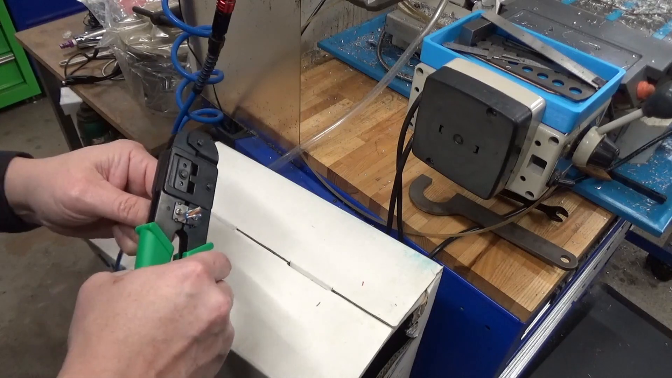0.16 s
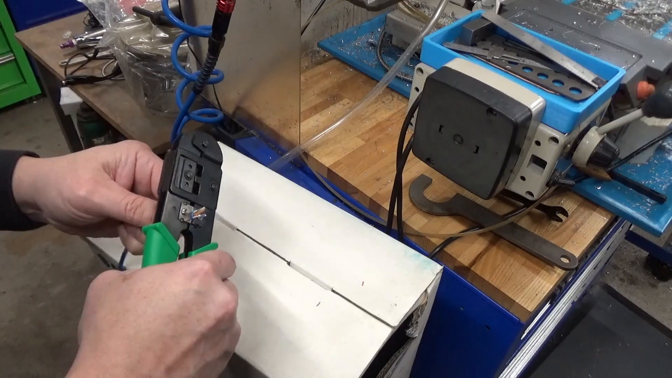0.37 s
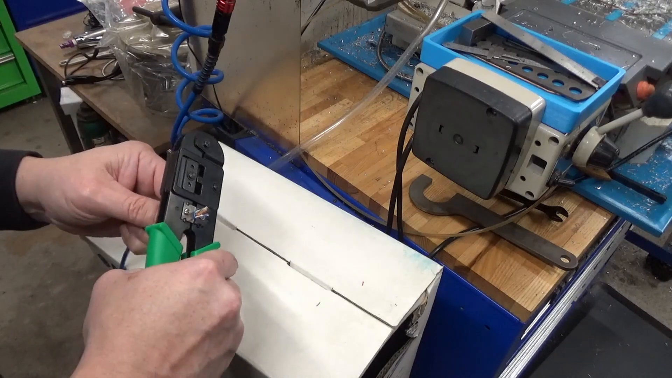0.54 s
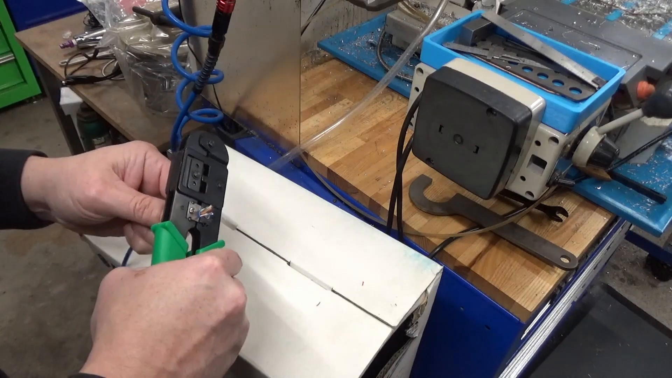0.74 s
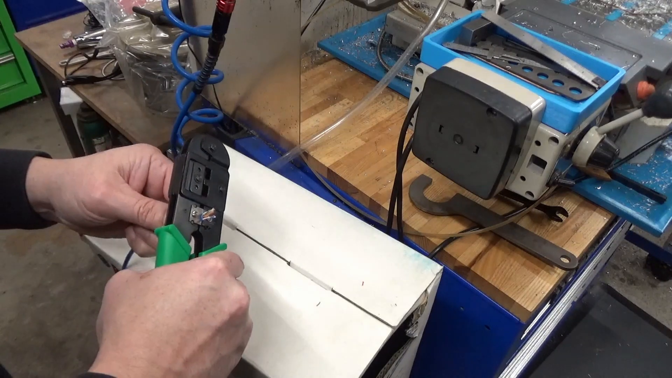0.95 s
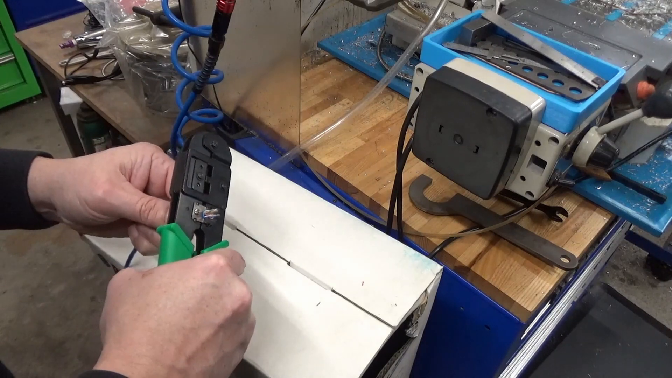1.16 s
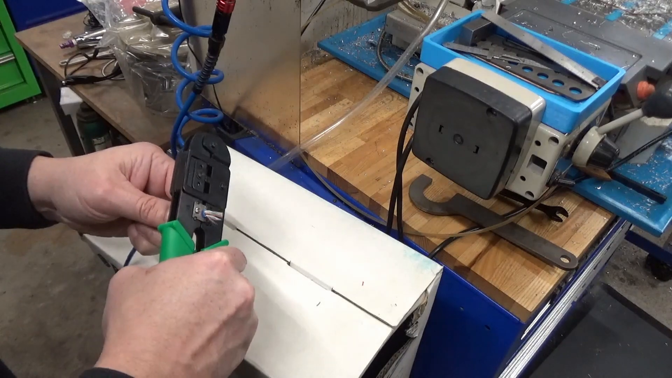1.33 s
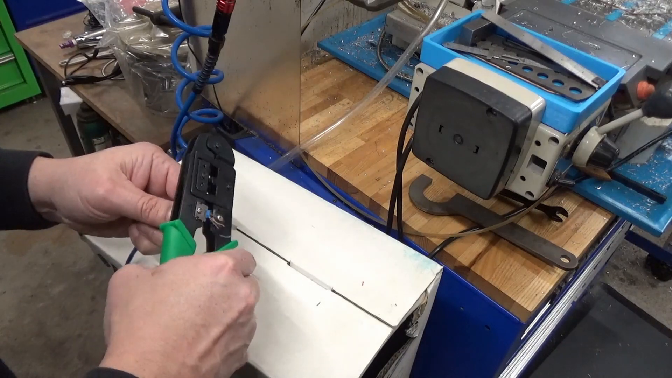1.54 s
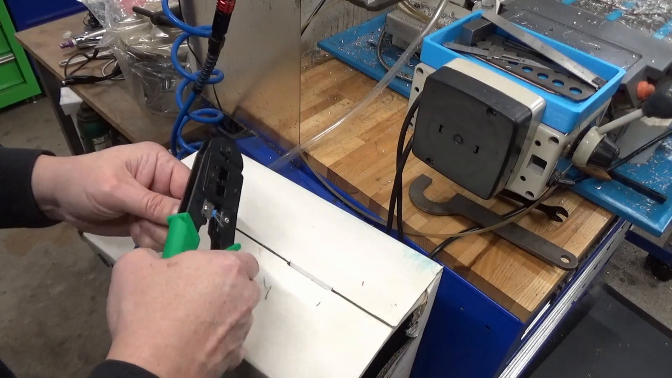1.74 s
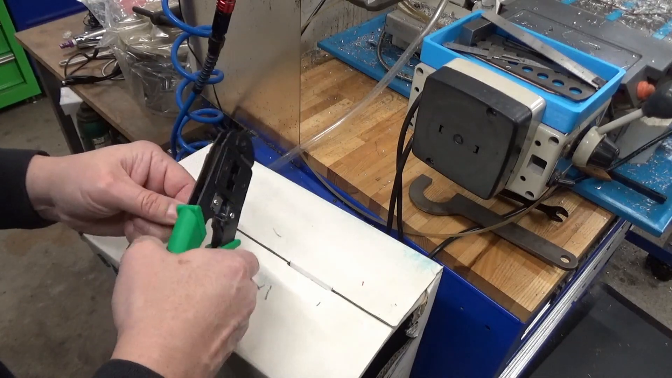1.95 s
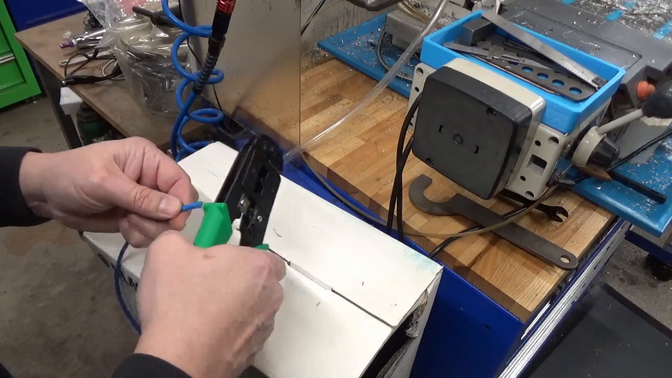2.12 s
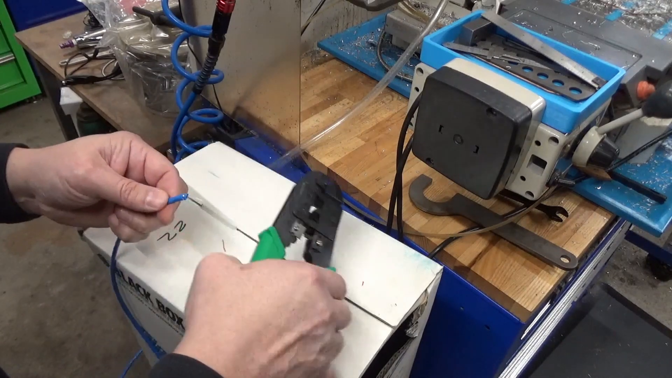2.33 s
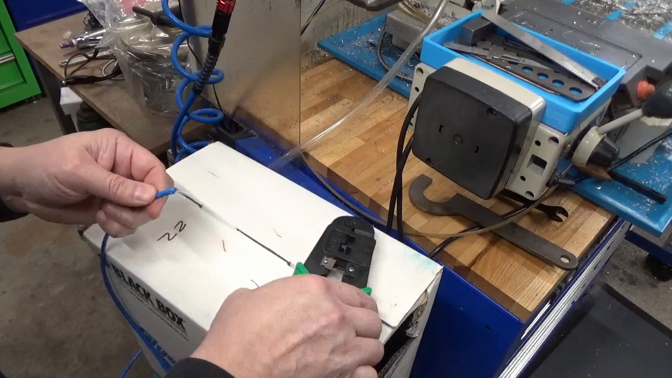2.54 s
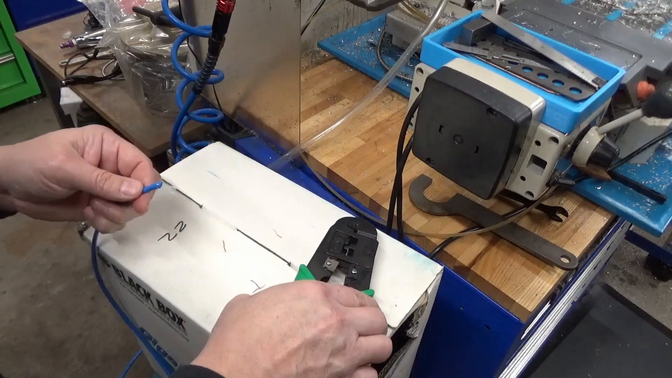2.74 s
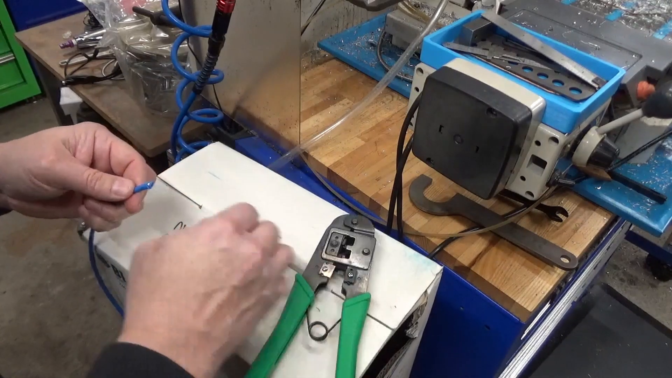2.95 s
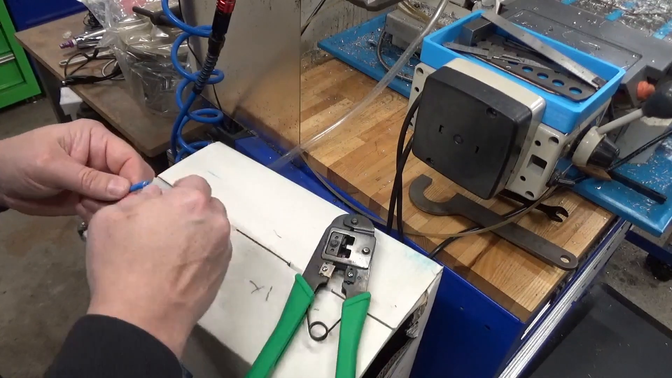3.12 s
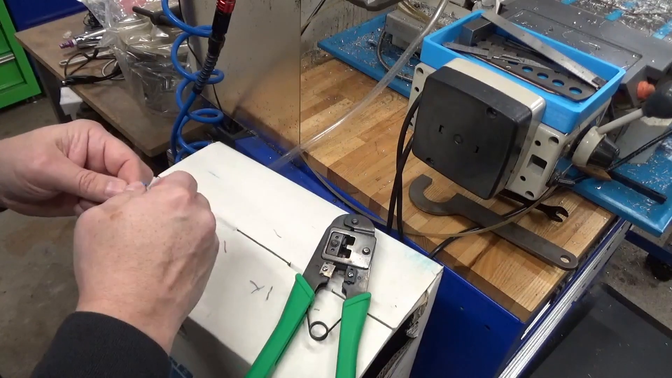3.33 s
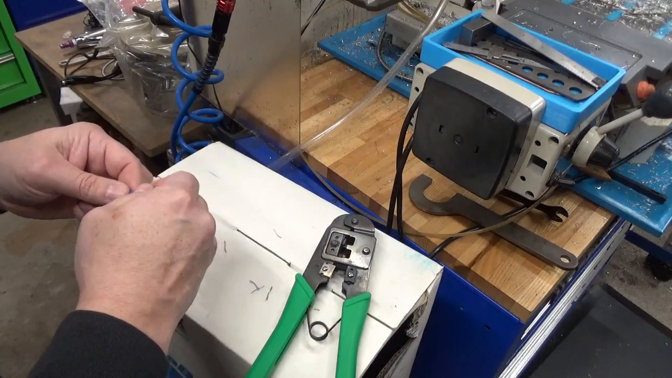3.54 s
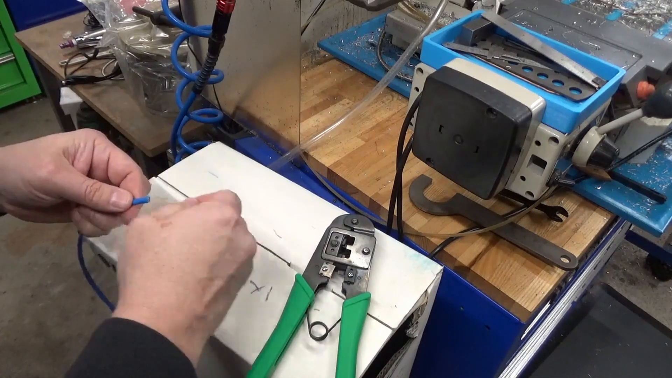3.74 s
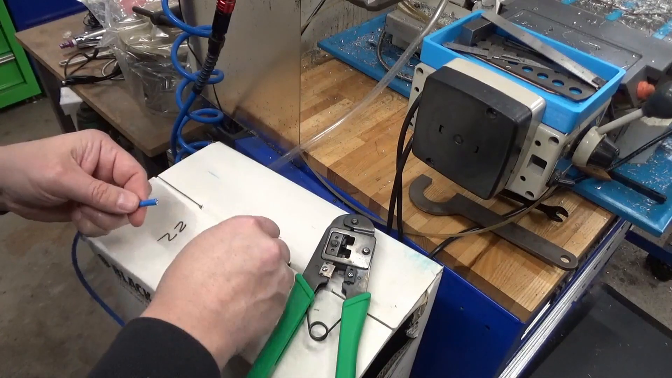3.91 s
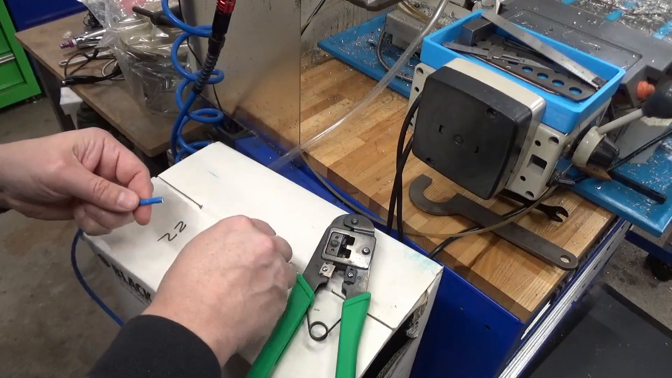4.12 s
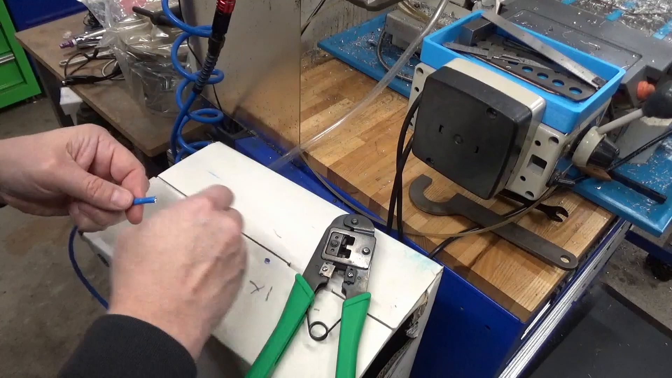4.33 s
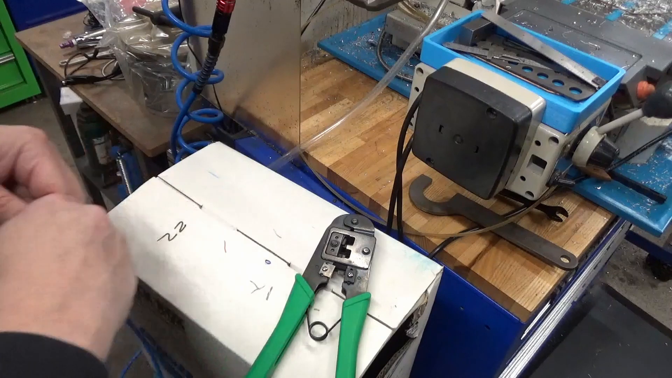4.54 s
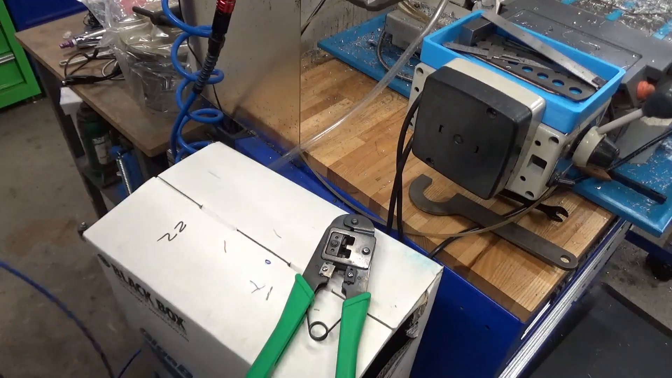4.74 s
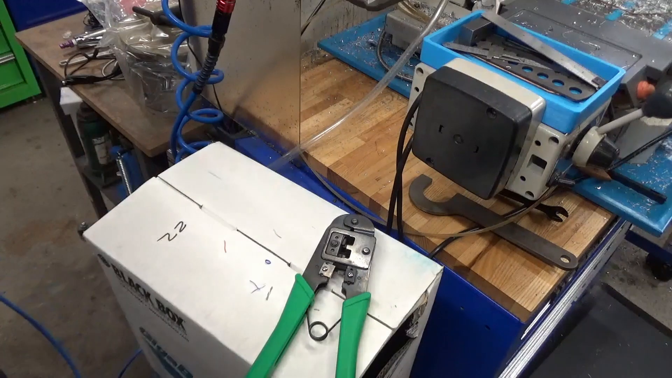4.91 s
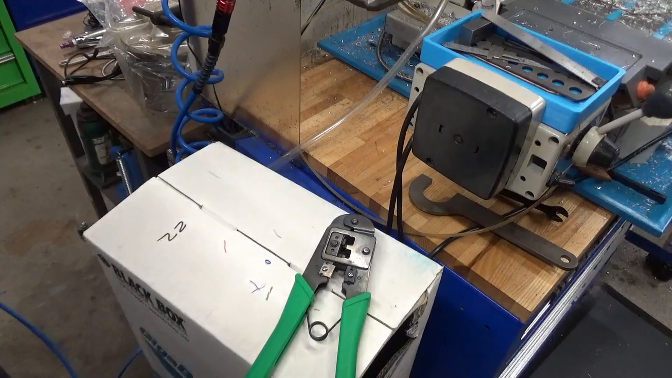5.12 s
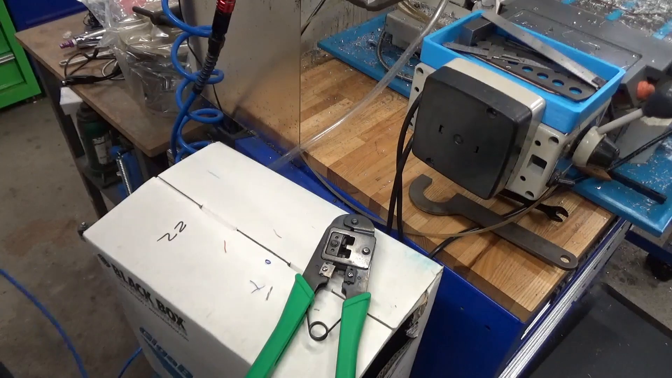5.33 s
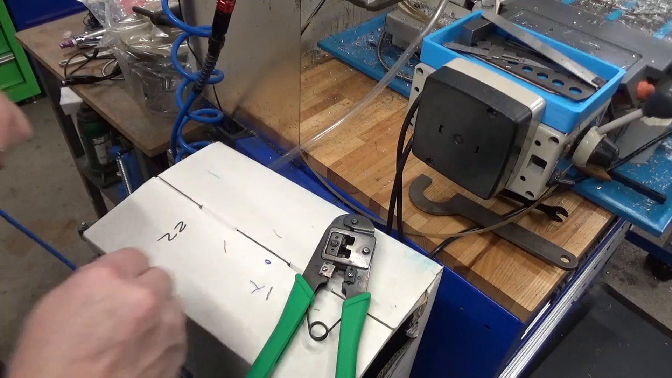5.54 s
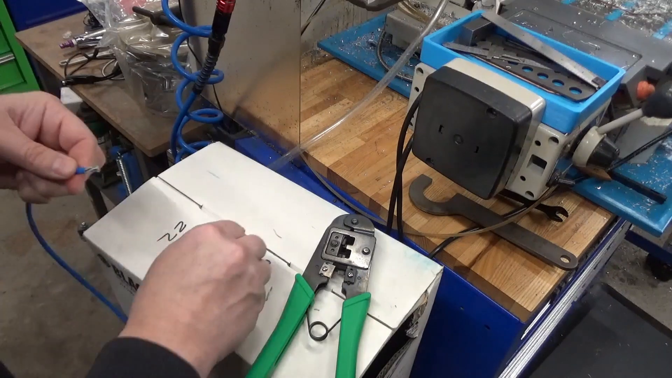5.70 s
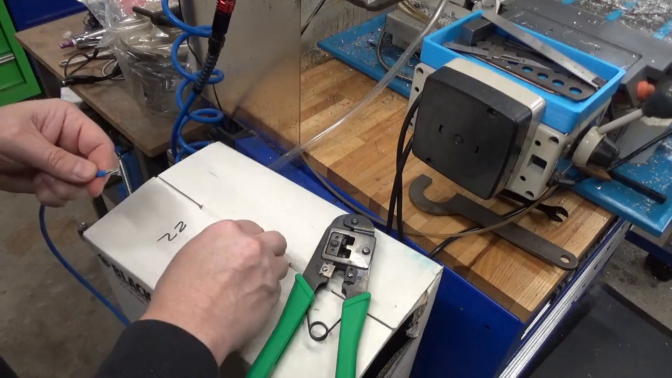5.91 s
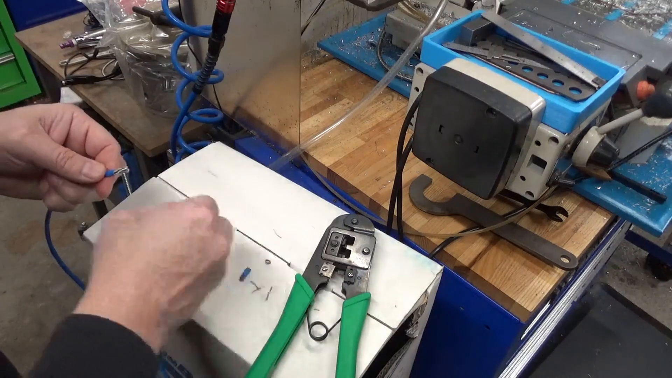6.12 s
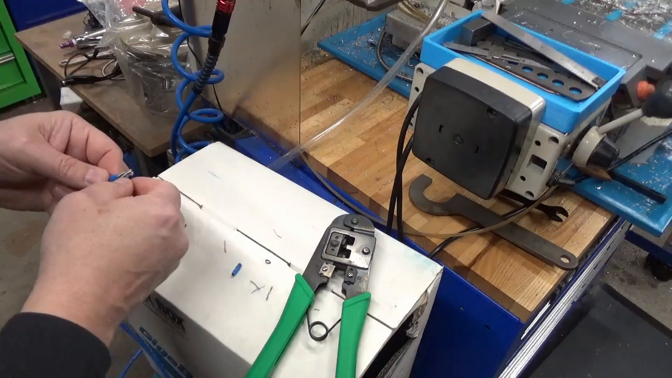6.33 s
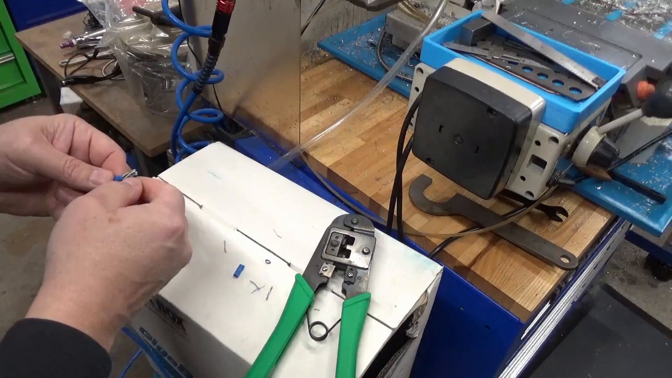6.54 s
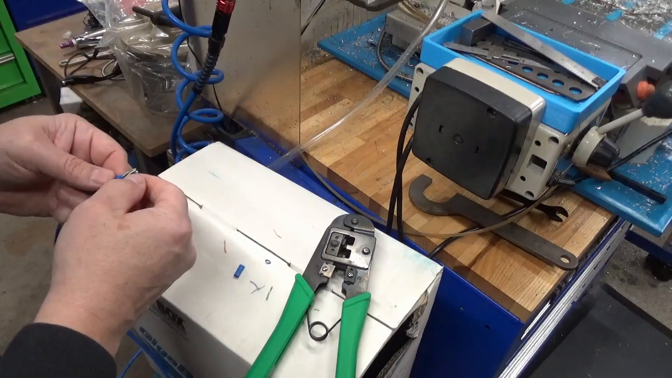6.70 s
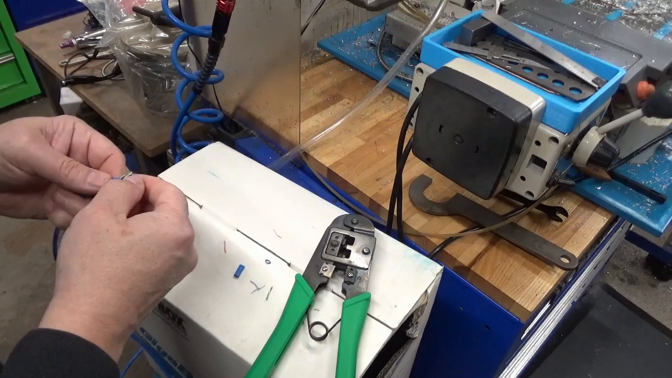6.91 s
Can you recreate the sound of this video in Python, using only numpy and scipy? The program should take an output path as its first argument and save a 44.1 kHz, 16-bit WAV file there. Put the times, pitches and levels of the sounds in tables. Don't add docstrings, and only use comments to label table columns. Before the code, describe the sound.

Near stereo camera microphone, small hard-surfaced workshop with short reverberation. Quiet handling leads to one bright metallic bite and a dense run of ratchet clicks. The tool touches, slides and thumps onto an empty-sounding box. Small cable cuttings snap and fall, skin rubs cardboard, a brief low puff of air passes, and wire ends click irregularly. Soft hiss, distant motor drone and a tiny steady camera tick continue underneath.

```python
import sys
import numpy as np
from scipy import signal
from scipy.fft import rfft, irfft
from scipy.io import wavfile
from scipy.ndimage import uniform_filter1d

SR = 44100
rng = np.random.default_rng(int(sys.argv[2]) if len(sys.argv) > 2 else 0)


def dump_mix(stems):
    frames = np.atleast_2d(stems).T
    limited = np.clip(frames, -1, 1)
    pcm = np.round(limited * 32767).astype(np.int16)
    wavfile.write(sys.argv[1], SR, pcm)


def invert_db(level):
    return 10 ** (np.asarray(level, dtype=float) / 20)


N = 307124

# (frequency [Hz], level [dB], T60 [s])
BOX_MODES = [(329, 4.5, 0.085), (390, 5.5, 0.09), (458.4, 3, 0.07), (539, -1, 0.066), (601, 2.5, 0.075),
             (706, 0, 0.048), (792, 3, 0.038), (870, -2, 0.023)]
# (frequency [Hz], level [dB], T60 [s])
KNOCK_MODES = [(850, 2, 0.009), (980, 1, 0.012), (1196, 1, 0.0096), (1390, 1, 0.0085), (1670, -4, 0.006),
               (2010, -5, 0.004)]
# (frequency [Hz], level [dB], T60 [s])
SPARKLE_MODES = [(6000, 0.37, 0.0031), (6610, -1.2, 0.0063), (7290, 1.8, 0.0037), (7910, 0.5, 0.0062),
                 (8450, 0, 0.0041), (9330, -0.71, 0.0042), (10650, -0.66, 0.0025)]


def rms_one(x):
    return x / np.sqrt(np.mean(x ** 2) + 1e-20)


def in_time(rows):
    s, *columns = np.transpose(rows)
    return [np.interp(np.arange(N) / SR, s, column) for column in columns]


def at_hz(points, hz):
    point_hz, value = np.transpose(points)
    return np.interp(np.log(hz), np.log(point_hz), value)


def drift(rate):
    r = np.exp(-80 * np.pi * rate / SR)
    white = rng.standard_normal(N // 40 + 2002)
    slow = signal.lfilter([1], [1, -2 * r, r * r], white)[2000:]
    return np.interp(np.arange(N) / 40, np.arange(len(slow)), rms_one(slow))


def ring(force, hz, t60):
    r, w = invert_db(-60 / (t60 * SR)), 2 * np.pi * hz / SR
    return signal.lfilter([0, np.sin(w)], [1, -2 * r * np.cos(w), r * r], force + 1e-18)


def band(x, low_hz, high_hz):
    return signal.sosfilt(signal.butter(2, [low_hz, high_hz], "band", fs=SR, output="sos"), x)


def within(x, modes):
    return band(x, modes[0][0] * .65, modes[-1][0] * 1.4)


def stereo_band(white, low_hz, high_hz, likeness):
    mid, side = band(white, low_hz, high_hz)
    alike = np.clip(at_hz(likeness, np.sqrt(low_hz * high_hz)), -1, 1)
    return np.sqrt(1 + alike) * mid + np.sqrt(1 - alike) * side * [[1], [-1]]


def air(patchy_db):
    # (frequency [Hz], level [dB per Hz])
    spectrum = [(12, -31), (20, -3), (39, -5.5), (59, -14.5), (124, -6.5), (184, -11.5), (320, -13),
                (375, -14.5), (896, -14), (1080, -17), (1300, -14.5), (2080, -19), (3020, -22.5),
                (3730, -23.5), (11000, -28.5), (14300, -59), (22000, -120)]
    # (frequency [Hz], coherence [1])
    likeness = [(60, 1), (170, 0.89), (490, 0.066), (1400, 0.028), (4000, 0.057), (11000, 0.73)]
    out, together = 0, drift(1.5)
    edges = 18 * 2 ** np.arange(0, 9.6, .4)
    white = rng.standard_normal((2, 2, N + SR))
    for k, (low, high) in enumerate(zip(edges, edges[1:])):
        pair = stereo_band(white[k % 2], low, high, likeness)[:, SR:]
        out = out + invert_db(at_hz(spectrum, np.sqrt(low * high)) + patchy_db * together) * pair
    return invert_db(-61.5) * rms_one(out)


def hum():
    # (frequency [Hz], rms level [dB])
    motors = [
        (119.8, -69),
        (147, -78),
    ]
    out = 0
    for hz, level_db in motors:
        turns = np.arange(N) * hz / SR + 0.096 * drift(2.0)
        out = out + invert_db(level_db + 2.0 * drift(4.7)) * np.sqrt(2) * np.sin(2 * np.pi * turns)
    return out


def draught():
    # (time [s], level [dB])
    gust = [
        (4.9, -84),
        (4.96, -57),
        (5.04, -70),
        (5.15, -56),
        (5.22, -64),
        (5.28, -87),
    ]
    level_db, = in_time(gust)
    turbulence = ring(rng.standard_normal(N), 33, .15)
    return invert_db(level_db) * rms_one(ring(turbulence, 38, .15))


def lens_motor():
    # (time [s], level [dB])
    ticking = [
        (0, -73.5),
        (.8, -75.5),
        (1.0, -97),
        (2, -76),
        (3.6, -72),
        (4.6, -79),
        (5.2, -71.5),
        (6.96, -73),
    ]
    level_db, = in_time(ticking)
    frame = np.arange(N) / SR * 30000 / 1001 - .15
    step = np.exp(-(frame % 1) * 5.4) * rng.standard_normal(N)
    odd = frame % 2 > 1
    shell = ring(step, 2830, 0.0057) + invert_db(-5 + 1.7 * odd) * ring(step, 3320, 0.0076)
    return invert_db(level_db) * rms_one(shell)


def workshop(x):
    # (frequency [Hz], T60 [s])
    reverberation = [(150, 0.45), (600, 0.33), (2500, 0.28), (6000, 0.25), (11000, 0.14)]
    # (frequency [Hz], coherence [1])
    likeness = [(150, 1), (600, 0.96), (2500, 0.68), (8000, 0.37)]
    s = np.arange(SR // 2) / SR
    bench = 1 + 2.1 * np.exp(-s / 0.0088)
    onset = np.minimum(s / 0.0022, 1)
    echoes, edges = 0, 130 * 2 ** np.arange(0, 7, .8)
    for low, high in zip(edges, edges[1:]):
        pair = stereo_band(rng.standard_normal((2, len(s))), low, high, likeness)
        dying = invert_db(-60 * s / at_hz(reverberation, np.sqrt(low * high)))
        echoes = echoes + pair * dying * bench * onset
    waves = rfft(echoes)
    power = np.abs(waves) ** 2
    fine, broad = uniform_filter1d(power, size=30), uniform_filter1d(power, size=500)
    echoes = irfft(waves * np.sqrt(broad / (fine + 1e-12)))[:, :int(.45 * SR)]
    return signal.fftconvolve(x[None], echoes / np.sqrt(np.sum(echoes ** 2) / 2))[:, :N]


def placed(x):
    # (time [s], left minus right [dB])
    hands = [(0.0, 3.5), (0.54, -0.5), (1.28, 1), (1.41, 0), (2.27, 1), (2.69, 0), (3.82, 1.5), (4.21, 0),
             (4.38, 1), (4.98, 0.5), (5.18, 7), (5.33, 1), (5.46, 1), (6.07, 1.5), (6.96, 5)]
    pan_db, = in_time(hands)
    return x * invert_db(pan_db * np.array([[.5], [-.5]]))


def pressure():
    # (time of most pressure [s], swell [s], fade [s], level [dB], skin rasp [dB])
    lid = [(0.01, .1, 1, -64.5, 6), (1.046, 0.58, .15, -68, -64), (1.4, 0.54, 0.42, -72, -11),
           (1.62, 0.09, 0.28, -57, 14.5), (2.336, 0.33, 0.35, -81, -2), (2.61, 0.54, 0.34, -51, -1.5),
           (2.85, 0.38, 0.12, -52, 2.5), (2.96, 0.041, 0.049, -36.5, -2), (3.702, 0.16, 0.51, -57, 6),
           (3.845, 0.028, 0.24, -47, 1), (4.1, 0.11, 0.42, -60.5, -4), (4.38, 0.17, 0.092, -67, 11),
           (4.49, 0.11, 0.063, -49, 7), (4.696, 0.077, 0.027, -54.5, -2), (4.825, 0.084, 0.044, -48, 0),
           (4.91, 0.08, 0.1, -49.5, 2.5), (5.448, 0.074, 0.084, -55, 4), (5.56, 0.11, 0.39, -61, 8),
           (5.71, 0.11, 0.26, -46, 5), (6.008, 0.025, 0.019, -52, -3), (6.15, 0.76, 0.15, -56, 7),
           (6.36, 0.27, 0.048, -58, 10), (6.67, 1, 0.19, -58.5, 3), (6.91, 0.22, 0.28, -55, 5.5)]
    # (time of most pressure [s], swell [s], fade [s], level [dB])
    scoring = [
        (1.73, 0.07, 0.28, -46),
    ]
    teasing = [
        (5.55, 0.37, 0.55, -74),
        (5.98, 0.91, 0.7, -61),
        (6.45, 0.12, 0.67, -55),
        (6.672, 0.29, 0.18, -56),
        (6.885, 0.11, 0.13, -46),
    ]
    scrapes = [
        (1.51, 0.33, 0.18, -68.5),
        (2.61, .04, .1, -64),
        (2.665, 0.16, 0.081, -55.5),
        (2.82, 0.034, 0.027, -46.5),
        (4.18, 0.18, 0.057, -62),
        (4.5, 0.065, 0.066, -65),
        (4.87, 0.52, 0.39, -65.5),
        (5.28, 0.041, 0.16, -60.5),
        (6.752, 0.0085, 0.038, -56),
    ]
    panel = [
        (2.3, 0.12, 0.12, -69.5),
        (4.696, 0.026, 0.034, -55),
        (4.825, 0.065, 0.052, -46),
        (4.9, 0.089, .08, -50.5),
        (5.58, 0.066, 0.086, -55),
        (5.72, 0.043, 0.11, -67),
        (6.14, 0.092, 0.11, -55.5),
    ]
    peeling = [
        (3.843, .012, .09, -55),
        (4.483, 0.006, 0.02, -38),
        (4.47, 0.1, 0.05, -51.5),
    ]
    sliding = [
        (2.5, 0.24, .4, -67),
        (5.55, 0.25, 0.59, -66),
        (5.95, 0.46, .6, -58),
        (6.5, 0.32, .6, -63.5),
    ]
    strokes = [(lid, (-2.5, -10.5, -17.5, -22, -16, -50)), (scoring, (-11, -4.5, -4, -8, -7.5, -40)),
               (teasing, (-30, -16.5, -2, -15.5, -35, -25)), (scrapes, (-37, -39, -5, 0, -42, -38)),
               (panel, (-17, -22, -30, -35, -1.5, -40)), (peeling, (-20, 1.5, -15, -24, -25, -40)),
               (sliding, (-40, -40, -40, -40, -40, 0))]
    resting_db = (-74, -73.5, -78.5, -74.5, -87, -84)
    stroke_range_db = 20
    s = np.arange(0, N + 64, 64) / SR
    power = invert_db(resting_db)[:, None] ** 2 + 0 * s
    for rows, mix_db in strokes:
        for top_s, swell_s, fade_s, level_db, *rasp_db in rows:
            away = np.where(s < top_s, (top_s - s) / swell_s, (s - top_s) / fade_s)
            share_db = np.add(mix_db, sum(rasp_db) * np.array([0, 1, 1, 1, 0, 0]))
            power = power + invert_db(share_db[:, None] + level_db - stroke_range_db * away) ** 2
    return in_time(np.transpose([s, *(10 * np.log10(power))]))


def rubbing(per_s, grain_db, damping):
    # (frequency [Hz], level [dB], T60 [s])
    jacket = [(1002, 0, 0.01), (1353, 0, 0.022), (1640, -2, 0.012), (1900, -5, .01), (2060, -5.5, 0.0089)]
    wires = [(2964, 6.6, 0.012), (3500, 12, 0.0035), (4440, 3, 0.0057)]
    panel = [(448, 0.5, 0.049), (548, -5, 0.056), (615, 1, 0.082), (690, -4.5, 0.042)]
    sheath = [(1700, -10, 0.03), (2930, -0.5, 0.03)]
    out = 0
    for modes, level_db in zip([BOX_MODES, jacket, wires, SPARKLE_MODES, panel, sheath], pressure()):
        sizes = invert_db(grain_db * np.minimum(rng.exponential(1, N), 5)) * rng.choice([-1, 1], N)
        slips_per_s = per_s * modes[0][0] * invert_db(3 * drift(25))
        slips = sizes * (rng.random(N) < slips_per_s / SR)
        body = sum(invert_db(db) * ring(slips, hz, t60 * damping) for hz, db, t60 in modes)
        out = out + invert_db(level_db) * rms_one(within(body, modes))
    return out


def thuds():
    # (time [s], peak level [dB])
    landings = [
        (2.594, -32.5),
        (2.678, -30.5),
        (2.824, -45),
        (2.904, -37),
        (2.919, -22),
        (2.926, -17.5),
        (2.947, -34),
        (3.03, -32),
    ]
    # (frequency [Hz], level [dB], T60 [s])
    deep = [(121, -17, 0.042), (157, -1, 0.088), (199, 4, 0.071), (245, -0.5, 0.057)]
    s, peak_db = np.transpose(landings)
    pushes = np.zeros(N)
    pushes[(s * SR).astype(int)] = -invert_db(peak_db - 11.5)
    return within(sum(invert_db(db) * ring(pushes, hz, t60) for hz, db, t60 in deep), deep)


def contacts(rows, low_modes, knock_modes, snap_modes, sparkle_modes=SPARKLE_MODES):
    chatter_ms, echo_ms, echo_db, snap_db = 2.75, 1.7, -10, 21
    low_away_db, high_away_db = -12, -15
    tip_hz = 5800
    room_blur = .4
    s, peak_db, low_db, knock_db, sparkle_db, spot_hz, low_spot_hz = np.transpose(rows)
    ms = np.arange(3300) * 1000 / SR
    chance = rng.standard_normal((len(rows), 3400))
    force = chance[:, :len(ms)] * np.exp(-np.log(30) * ms / chatter_ms)
    force[:, 0] = invert_db(snap_db)
    lag = int(echo_ms * SR / 1000)
    force[:, lag:] += invert_db(echo_db) * force[:, :-lag]
    snap_alone = force * (ms == 0)
    layers = [(low_modes, low_db, low_spot_hz, low_away_db),
              (knock_modes, knock_db, spot_hz, 0),
              (snap_modes, 0, spot_hz, high_away_db),
              (sparkle_modes, sparkle_db, spot_hz, high_away_db * (spot_hz > tip_hz))]
    sounds, drawn = 0, len(ms)
    for modes, share_db, place_hz, loss_db in layers:
        low = modes is low_modes
        body = 0
        for hz, level_db, t60 in modes:
            drawn += 1
            away_db = loss_db * np.abs(np.log2(hz / place_hz))
            strength = invert_db(level_db + away_db + 1.5 * chance[:, drawn])
            sign = -1 if low else (-1) ** drawn
            direct = ring(force, hz, t60)
            averaged = ring(snap_alone, hz, t60 * (1 if low else room_blur))
            body = body + sign * strength[:, None] * np.stack([direct, averaged])
        body = within(body, modes)
        energy = np.sqrt(np.sum(body ** 2, axis=2, keepdims=True))
        peak = np.abs(body[0]).max(axis=1, keepdims=True)
        body = body * energy[0] / energy / peak
        sounds = sounds + invert_db(peak_db + share_db)[:, None] * body
    out = np.zeros((2, N + len(ms)))
    for k, start in enumerate((s * SR).astype(int)):
        out[:, start:start + len(ms)] += sounds[:, k]
    return out[:, :N]


def coloured(s, peak_db, thump_db, knock_db, sparkle_db, spot_hz, low_spot_hz):
    return np.transpose(np.broadcast_arrays(s, peak_db, thump_db, knock_db, sparkle_db, spot_hz, low_spot_hz))


def box_contacts():
    # (time [s], peak [dB], thump [dB], sparkle [dB], lid spot [Hz])
    set_down = [
        (2.594, -28.5, 1, -15, 600),
        (2.602, -43, 3, -8, 600),
        (2.6767, -29, 0, -13, 600),
        (2.826, -34, 7, -6, 353),
        (2.9084, -34.5, 9.5, 4.5, 790),
        (2.9192, -23.5, 3.5, -3, 450),
        (2.928, -31.5, 3.5, -7, 450),
        (2.9439, -39.5, 5, 9.5, 560),
        (2.9668, -41, 0, -2, 404),
        (3.0278, -38.5, 7.5, 3, 770),
    ]
    # (time [s], peak [dB])
    bright_ticks = [(0.148, -56.5), (1.422, -54), (1.512, -52.5), (1.533, -50), (2.2349, -51.5),
                    (2.548, -61), (2.989, -43.5), (3.057, -49), (3.099, -49.5), (3.14, -53.5), (3.168, -56),
                    (3.6127, -52.5), (4.287, -51), (4.389, -53), (4.4212, -49), (6.754, -44)]
    # (time [s], peak [dB], struck spot [Hz])
    dull_ticks = [(0.864, -44.5, 2630), (4.1678, -46, 2540), (4.2408, -47, 2860), (4.465, -48, 4400),
                  (4.477, -44, 4400), (4.487, -43, 4400), (4.5, -44, 4400), (4.512, -48, 4400),
                  (5.002, -46, 3050), (6.0069, -56, 2900), (6.0997, -40, 2930), (6.163, -44.5, 3100),
                  (6.1883, -38, 3380), (6.317, -33, 2250), (6.328, -39, 2260), (6.564, -35.5, 2280),
                  (6.6632, -42, 2890), (6.837, -39, 3100), (6.852, -58, 3080), (6.874, -27, 3400),
                  (6.888, -42, 3870)]
    # (time [s], thump peak [dB], knock
    # re thump [dB], lid spot [Hz])
    fingertips = [(2.3, -51, -27, 290), (2.496, -39, -22, 370), (4.2, -51, -28, 270), (3.1, -43, -18, 390),
                  (5.5222, -30, -26, 550), (5.695, -36, 3, 320), (3.87, -41, -10, 470),
                  (5.4, -51, -11, 350), (5.2, -59, -14, 530), (5.997, -37, -19, 380), (5.264, -33, 1, 910),
                  (4.9, -45, -15, 330)]
    # (time [s], peak [dB], thump [dB], sparkle [dB], struck spot [Hz])
    offcuts = [
        (4.122, -26.5, -27, -4.5, 3700),
        (4.131, -32.5, -26, -1, 5260),
        (4.1804, -35.5, -25, 4.5, 3220),
        (5.2635, -36, -14, -3, 2900),
        (5.2793, -49.5, -23, 15.5, 2160),
        (5.6734, -40, -5, -19, 2400),
        (5.9301, -29.5, -11.5, -3, 2900),
        (4.1745, -44, -29, 6, 7400),
        (5.931, -43.5, -20, 14.5, 10700),
    ]
    # (time [s], peak [dB], thump [dB], knock [dB], sparkle [dB])
    piece_drops = [
        (5.8607, -12, -12, -9, -11.5),
        (5.8804, -22.5, -18, -7, -10),
    ]
    # (frequency [Hz], level [dB], T60 [s])
    lid_snap = [(2100, -3.5, 0.0035), (2440, 1.5, 0.0028), (2795, 4.5, 0.0043), (3380, -0.5, 0.0034),
                (3800, -5.5, 0.0059), (4400, -2, 0.0044)]
    offcut_low = [(1080, 1, 0.0076), (1340, 3.5, 0.0069), (1580, 7, 0.0064), (2120, -2, 0.0028)]
    offcut_high = [(2220, 7, 0.011), (2920, -0.5, 0.011), (3660, 1.5, 0.0081), (4270, -0.5, 0.0087),
                   (4600, 3, 0.0098), (5240, 0.5, 0.0072)]
    wire_ends = [(2280, 1.5, 0.0071), (2900, 0.5, 0.0076), (3200, 3, 0.0066), (3550, 2.5, 0.0067),
                 (4000, 4, 0.0057), (4400, -3, .014)]
    piece = [(1990, 1, 0.0092), (2350, 4, 0.01), (2820, -1, 0.0077), (3600, 1.5, 0.0066),
             (4070, -1.5, .006), (4670, 4, 0.0063), (5240, -0.5, 0.0055)]
    piece_edge = [(6500, -2, 0.0035), (7850, -1, .004), (8850, 1, 0.0042), (9500, -2, .004),
                  (10600, -6, .003)]
    lid_middle_hz = 450
    s, db, thump, sparkle, place = np.transpose(set_down)
    laid = coloured(s, db, thump, -7.5, sparkle, 2800, place)
    s, db = np.transpose(bright_ticks)
    bright = coloured(s, db, -33, -7, 6, 4100, lid_middle_hz)
    s, db, spot = np.transpose(dull_ticks)
    dull = coloured(s, db, -17.5, -15, -16.5, spot, lid_middle_hz)
    s, db, knock, place = np.transpose(fingertips)
    snap_db = -22
    taps = coloured(s, db + snap_db, -snap_db, knock - snap_db, -1, 2400, place)
    s, db, thump, sparkle, spot = np.transpose(offcuts)
    cuts = coloured(s, db, thump, 4.5 + 0.59 * thump, sparkle, spot, lid_middle_hz)
    drops = coloured(*np.transpose(piece_drops), 3200, 620)
    on_lid = contacts(np.vstack([laid, bright, taps]), BOX_MODES, KNOCK_MODES, lid_snap)
    falling = contacts(cuts, BOX_MODES, offcut_low, offcut_high)
    ticking = contacts(dull, BOX_MODES, offcut_low, wire_ends)
    bouncing = contacts(drops, BOX_MODES, offcut_low, piece, piece_edge)
    return on_lid + falling + ticking + bouncing


def tool_contacts():
    # (time [s], peak [dB], knock re peak [dB], sparkle re peak [dB], struck spot [Hz])
    ratchet = [(1.5385, -13.5, -10.5, -10.5, 3600), (1.5646, -11, -12.5, -9, 3770),
               (1.584, -18, -5, -5, 3900), (1.5908, -16.5, -13, 1.5, 4500), (1.5928, -11.5, -36, 1.3, 4000),
               (1.627, -32, -23, -13, 3300), (1.630, -18, -16.5, -10, 3200), (1.654, -30, -6, -11, 3300),
               (1.6632, -22.5, -7, -6, 4260), (1.7023, -21.5, -25, -12, 3300), (1.7098, -26, -29, 2, 3800),
               (1.7135, -19, -10, -0.6, 3300), (1.7162, -30, -15, -10, 3000),
               (1.7239, -30.5, -14, 13.5, 4100), (1.745, -29.5, -19, 12, 8200), (1.7491, -20, -13, 4, 2870),
               (1.7525, -25, -14, -4, 3800), (1.7685, -36, -17, -4, 3000), (1.775, -24, -30, 0, 3930),
               (1.777, -28.5, -12, 8, 7200)]
    # (time [s], peak [dB], sparkle re peak [dB], struck spot [Hz])
    blade_skips = [(1.791, -42, 7, 7200), (1.8058, -40, 4, 7000), (1.8153, -43, 9, 9200),
                   (1.8208, -30, -12, 3500), (1.826, -36, 0, 6000), (1.834, -43, 6, 9500),
                   (1.8379, -38, 11, 7000), (1.848, -41, 6, 8500), (1.858, -35, 0.5, 4600),
                   (1.8644, -47, 12.5, 7240), (1.8727, -39, 2, 6200), (1.887, -41, 3, 7500),
                   (1.9012, -43, 5.5, 6960), (1.918, -49, 3, 7000)]
    # (frequency [Hz], level [dB], T60 [s])
    handles = [(240, -7, 0.03), (330, -1, 0.03), (490, -4, 0.021), (598, 4, 0.055)]
    grip = [(220, -6, .03), (350, -3, .025), (480, 2, .02), (620, -1, .015), (890, 0, .05), (1000, -3, .07),
            (1090, -3, .03)]
    jaws = [(2160, -18, 0.0025), (3010, 2, 0.0076), (3280, 0, .007), (3660, 2, 0.0061), (3940, 0, 0.005),
            (4360, 1, 0.0074), (4840, -3, .006), (5200, -1.5, 0.0092), (5600, -3, 0.0047)]
    blade = [(2240, 1, 0.008), (2270, 3, 0.0066), (3120, 3, 0.0077), (3600, -8.5, 0.0087),
             (4280, 2, 0.0074), (4680, 1.5, 0.01), (5080, 7.5, 0.0084), (5640, -1, 0.008)]
    blade_tip = [(6040, 3, .004), (6690, 1.5, 0.013), (7250, -1, 0.01), (7770, 1, 0.0089),
                 (8400, 0, 0.0073), (8900, 1.5, .007), (9600, 1.5, 0.0061), (10600, -1.5, .003)]
    handle_spot_hz = 560
    s, db, knock, sparkle, spot = np.transpose(ratchet)
    teeth = coloured(s, db, knock - 9, knock, sparkle, spot, handle_spot_hz)
    s, db, sparkle, spot = np.transpose(blade_skips)
    skips = coloured(s, db, -33, -9.5, sparkle, spot, handle_spot_hz)
    bite = coloured(1.1625, -16, -7.5, -10, 2, 4100, handle_spot_hz)
    turning = contacts(np.vstack([teeth, skips]), handles, KNOCK_MODES, jaws)
    return turning + contacts(bite[None], grip, KNOCK_MODES, blade, blade_tip)


def scene():
    hits = tool_contacts() + box_contacts() + thuds()
    near, radiated = hits + rubbing(per_s=1.2, grain_db=3.6, damping=0.48)
    echoes = invert_db(-7.5) * workshop(radiated)
    return placed(near + echoes) + air(patchy_db=0.0) + hum() + draught() + lens_motor()


def low_pass(x):
    return signal.sosfilt(signal.butter(12, 12160, fs=SR, output="sos"), x)


def record(dry):
    cut = signal.sosfilt(signal.cheby2(16, 26, 11205, fs=SR, output="sos"), dry)
    return low_pass(cut)


dry = scene()
out = record(dry)
dump_mix(out)
```